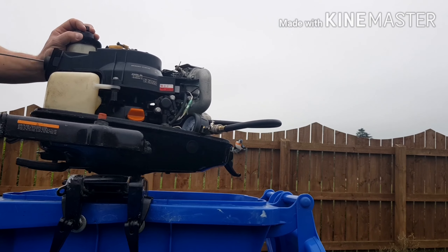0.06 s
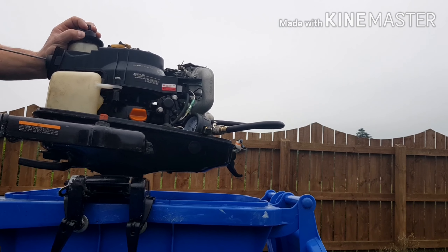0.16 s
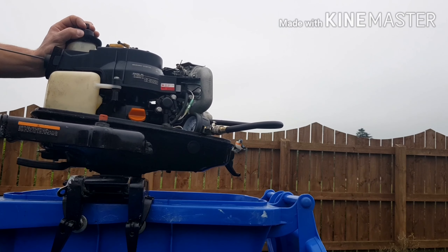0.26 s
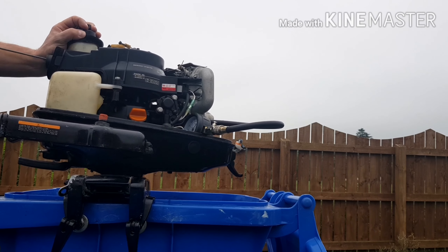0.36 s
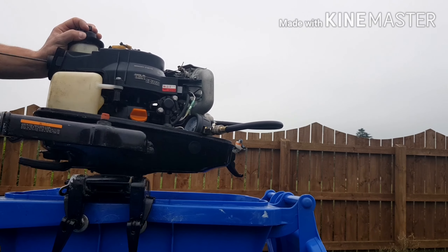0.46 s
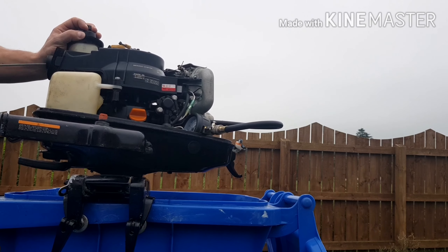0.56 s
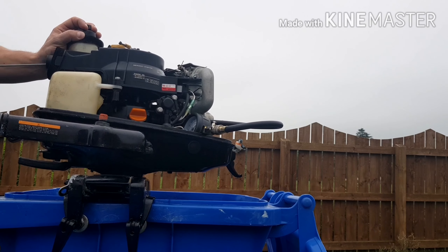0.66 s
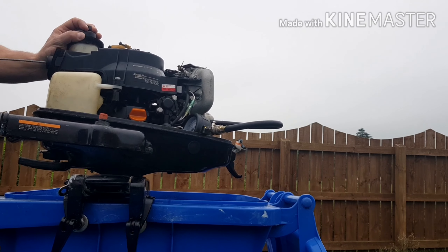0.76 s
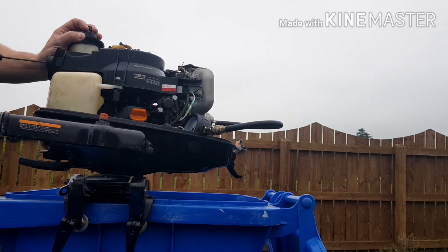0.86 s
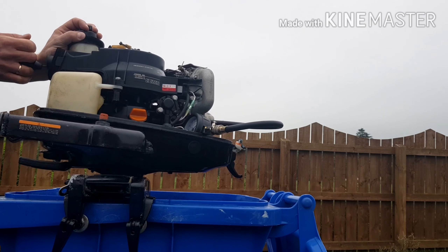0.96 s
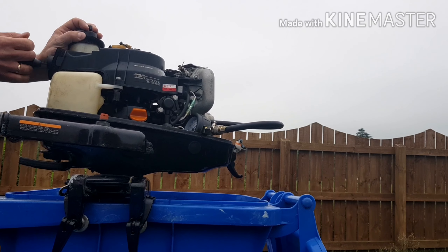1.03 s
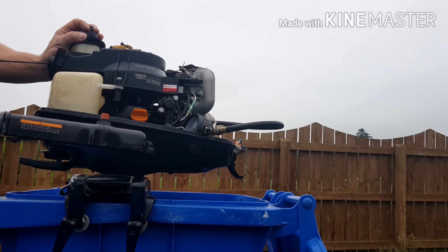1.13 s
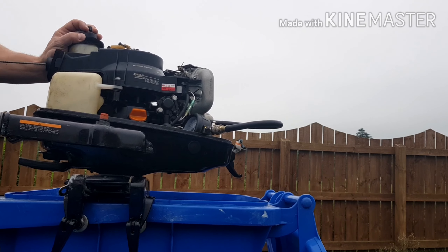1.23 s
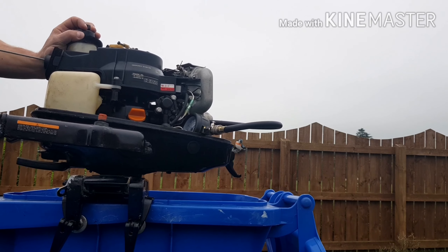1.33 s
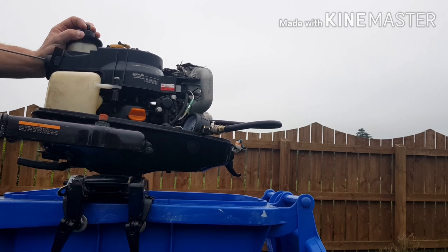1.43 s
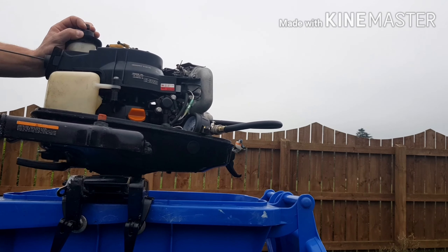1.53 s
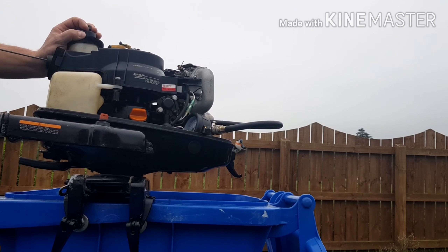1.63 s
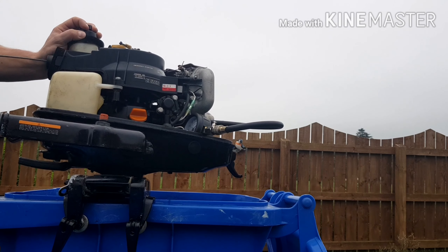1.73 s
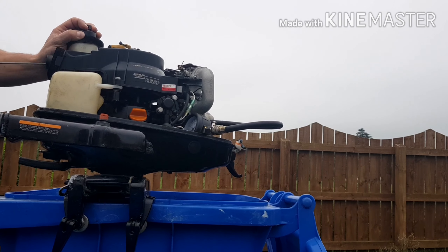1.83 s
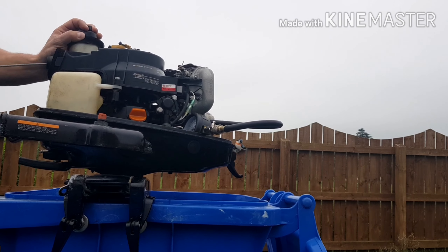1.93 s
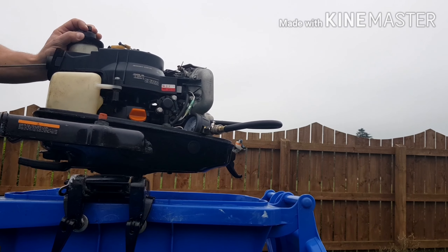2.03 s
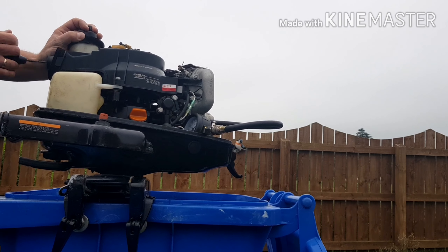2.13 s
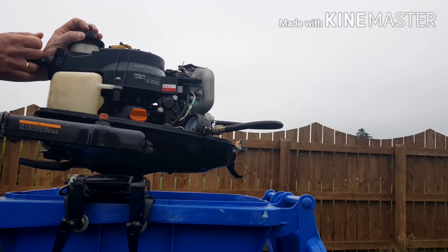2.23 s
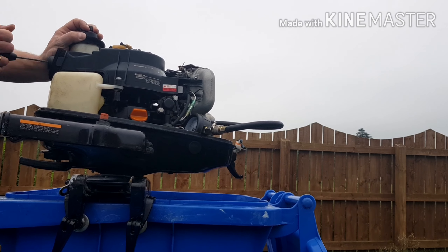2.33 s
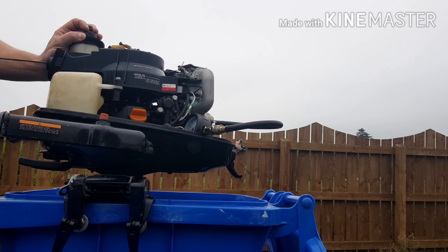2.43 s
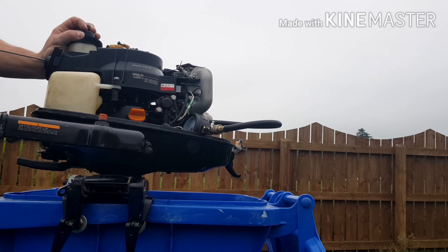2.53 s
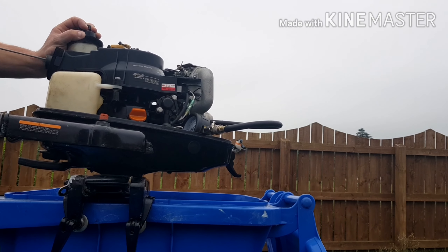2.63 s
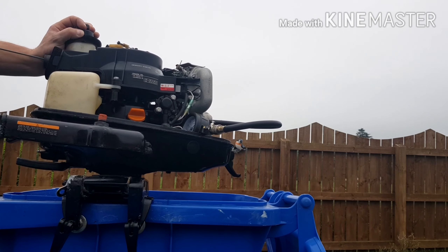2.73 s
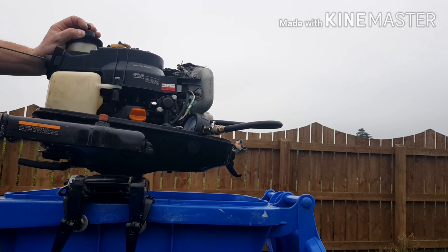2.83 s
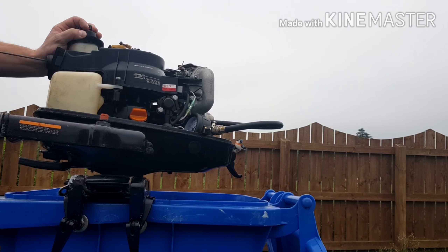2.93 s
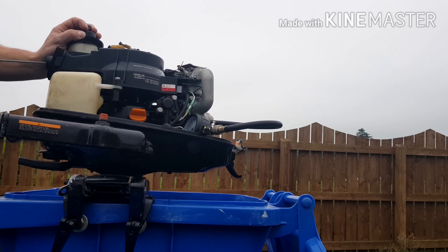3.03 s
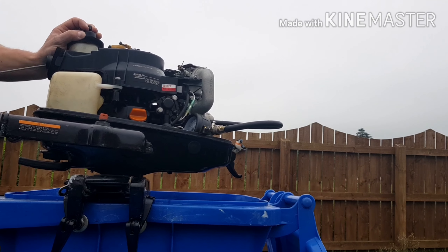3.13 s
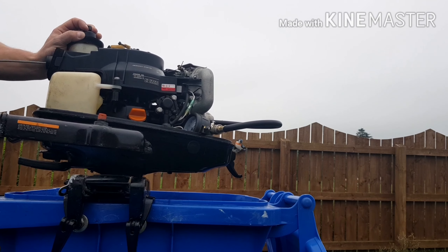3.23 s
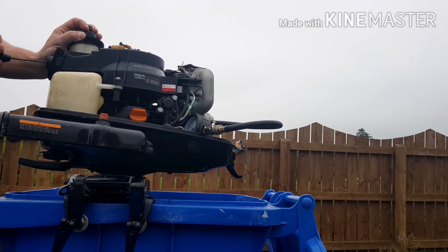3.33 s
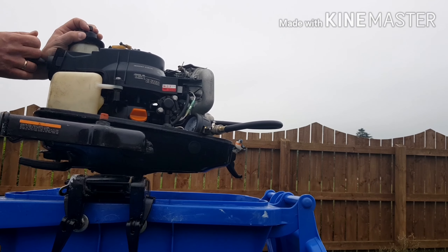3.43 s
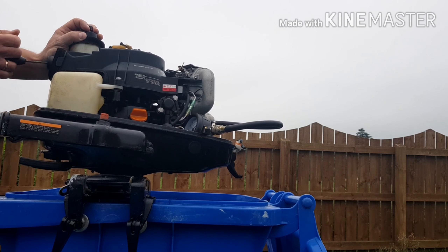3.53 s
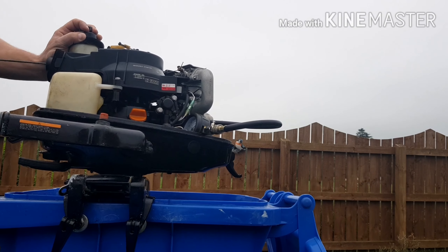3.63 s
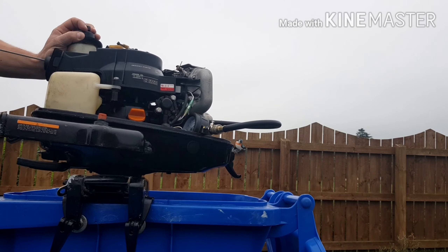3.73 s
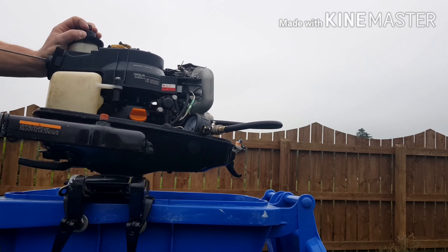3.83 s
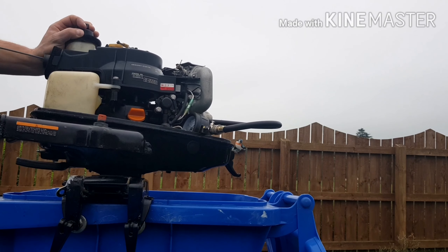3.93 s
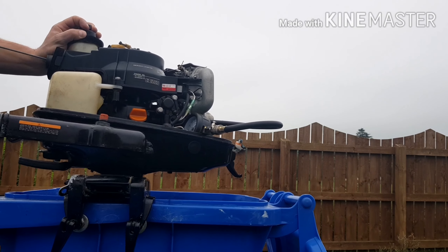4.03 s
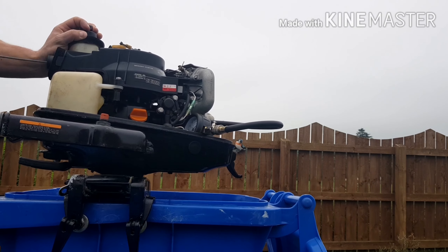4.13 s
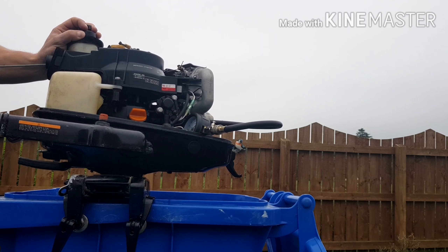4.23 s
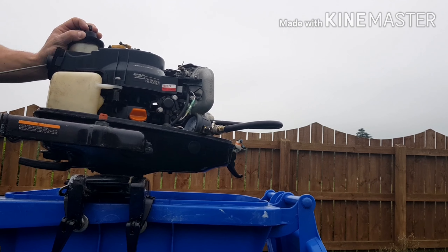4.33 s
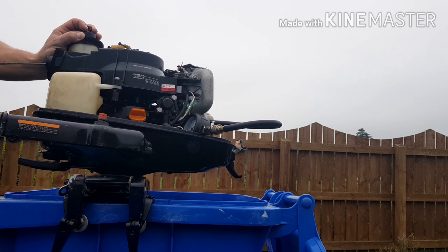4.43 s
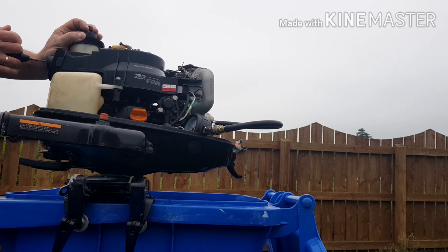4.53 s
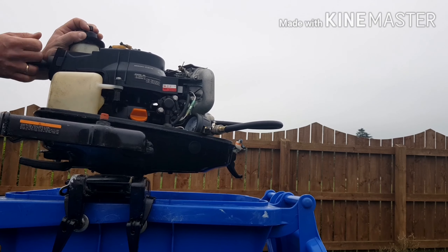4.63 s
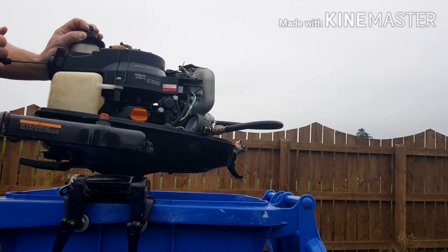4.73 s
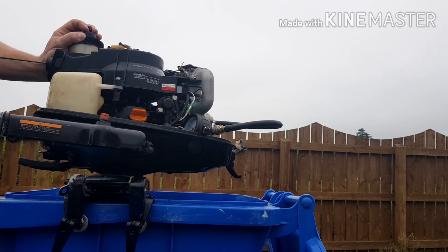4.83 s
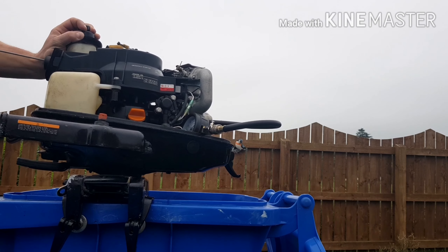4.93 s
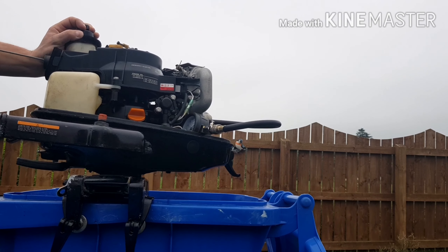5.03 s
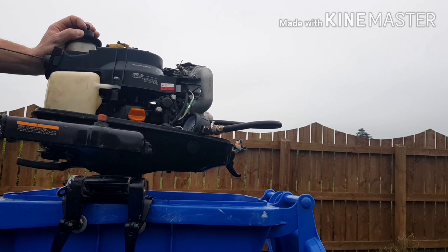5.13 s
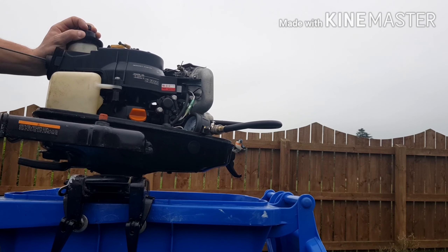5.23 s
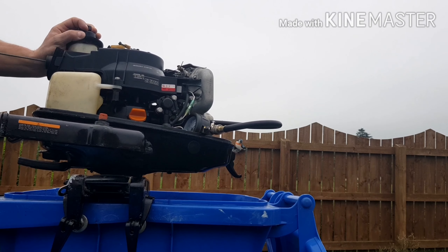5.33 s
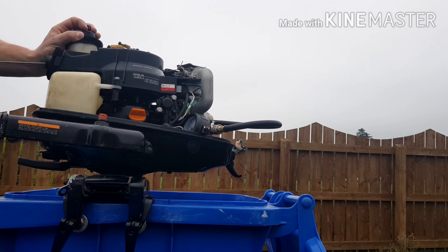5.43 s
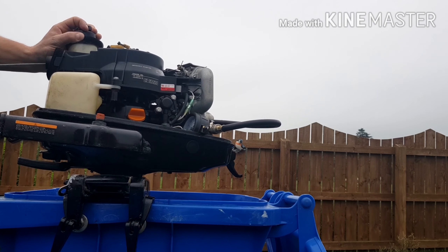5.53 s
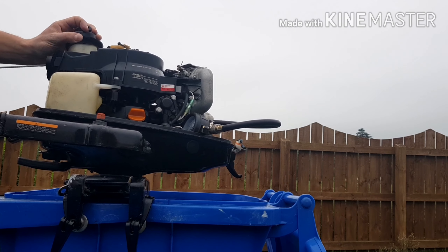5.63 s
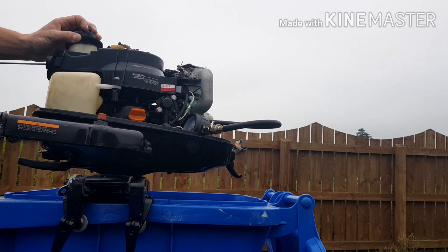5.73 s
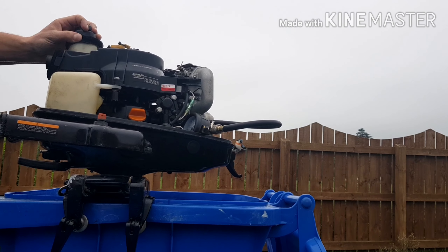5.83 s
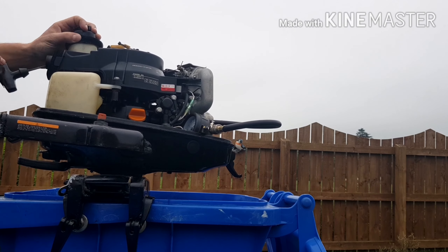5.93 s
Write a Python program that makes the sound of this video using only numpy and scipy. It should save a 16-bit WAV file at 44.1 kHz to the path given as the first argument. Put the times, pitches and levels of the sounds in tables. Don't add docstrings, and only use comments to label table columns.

```python
import sys
import numpy as np
from scipy import signal
from scipy.fft import rfft, irfft, next_fast_len
from scipy.io import wavfile
from scipy.ndimage import uniform_filter1d

SR = 44100
rng = np.random.default_rng(int(sys.argv[2]) if len(sys.argv) > 2 else 0)


def gain_from_db(level_db):
    decades = np.asarray(level_db, float) / 20
    return 10 ** decades


def wav_record(signal):
    frames = np.transpose(np.atleast_2d(signal))
    bounded = np.clip(frames, -1, 1)
    quanta = np.round(bounded * 32767).astype(np.int16)
    wavfile.write(sys.argv[1], SR, quanta)


N = 263714
T = np.arange(N) / SR
FAST = next_fast_len(N)

# (frequency [Hz], level [dB per Hz])
AIR_COLOUR = [(15, -33), (30, -4), (70, 9), (219, -35), (1860, -36), (3120, -29), (3480, -34),
              (14600, -24.5), (16300, -49)]
# (frequency [Hz], left minus right [dB])
PORT_LEAN = [(60, 2.5), (400, 1.6), (2000, 2.2), (8000, 1.8), (13000, 8)]
# (time [s], length [s], level [dB], lowest [Hz], highest [Hz])
RUSTLES = [(5.64, .05, -47.5, 2000, 15000), (5.78, .11, -56, 5100, 15000), (5.72, .4, -54, 1600, 5500),
           (.82, .3, -58, 500, 900), (3.28, .3, -58, 500, 900), (4.5, .3, -57, 500, 900),
           (3.621, .018, -24, 4800, 8500), (2.408, .014, -36, 3000, 8000), (5.862, .016, -55, 700, 8000),
           (5.95, .05, -52, 300, 2500), (3.575, .05, -50, 1500, 6000)]
# (time [s], level [dB], pitch [Hz])
SQUEAKS = [
    [(3.44, -93, 3100), (3.48, -61, 2740), (3.52, -52, 2440), (3.56, -58, 2240)],
    [(5.77, -71, 2000), (5.782, -53, 2100), (5.8, -63, 2200)],
]
# (frequency [Hz], level [dB per Hz])
RUMBLE_COLOUR = [(15, -45.5), (30, -22), (66, -0.5), (157, -2), (210, -5.5), (258, -5.5), (291, -13),
                 (450, -3.5), (580, -13), (990, -120)]
# (frequency [Hz], level [dB per Hz])
SCRAPE_COLOUR = [(1060, -53), (1800, -4.5), (2370, -10), (3220, -10), (3870, -15.5), (5200, -16.5),
                 (14900, -31), (15900, -34), (16300, -71)]
# (frequency [Hz], width [Hz], level [dB])
RATTLE_MODES = [(633, 49, 2.5), (925, 79, 0), (1253, 60, 0.5), (1728, 80, -5.5), (2210, 63, -14.5),
                (2790, 40, -17.5), (3100, 64, -19), (3410, 100, -15)]
# (crank at speed [s], slack before it [dB], rattle [dB], last compression [s], crank still [s])
PULLS = [
    (0.202, -6, -34, 0.79, 0.94),
    (1.408, -10.5, -34, 1.93, 2.41),
    (2.592, -24, -32.5, 3.27, 3.41),
    (3.82, -9.5, -32.5, 4.478, 4.615),
    (4.984, -18.5, -31, 5.56, 5.83),
]
# (rattle at last compression [dB], nearly still [s], level then [dB])
COASTS = [(-44.5, .86, -55), (-43.5, 2.15, -54), (-44.5, 3.34, -54), (-44.5, 4.55, -55), (-45, 5.775, -55)]
# (time [s], peak [dB])
THUMPS = [(0.0312, -23.5), (0.122, -25.5), (0.199, -24), (0.357, -20.5), (0.771, -37), (1.2446, -30),
          (1.288, -24.5), (1.4297, -26), (1.588, -24.5), (1.749, -54), (2.6557, -25), (2.812, -25),
          (3.027, -27.5), (3.6437, -24), (3.84, -24.5), (3.998, -25.5), (4.2085, -27), (5.022, -27),
          (5.072, -35), (5.178, -19), (5.2274, -30), (5.38, -29)]
# (frequency [Hz], level [dB per Hz])
TICK_COLOUR = [(880, -12), (1500, 4.5), (2150, -11), (3440, -15.5), (4070, -7), (7270, -8), (8030, -10.5),
               (9900, -11), (14300, -15.5), (16300, -22)]
# (frequency [Hz], t60 [s], level [dB], group)
BLOCK_MODES = [(3270, .018, -5, 0), (3430, .02, -4, 0), (3570, .022, -3, 0), (3760, .016, -7, 0),
               (2650, .016, -9, 0), (4900, .01, -6, 0)]
# (time [s], peak [dB])
TAPS = [(0.206, -41), (0.362, -39), (0.612, -42), (0.746, -41), (1.847, -44), (3.03, -42), (3.712, -45),
        (4.212, -40), (4.267, -43), (4.7233, -54), (4.878, -55), (5.4346, -44), (0.967, -50),
        (1.126, -44.5), (1.433, -36), (1.592, -45), (1.796, -41), (1.882, -39.5), (2.191, -47),
        (2.3536, -38.5), (2.8154, -38), (3.4172, -45.5), (3.5728, -41), (3.8426, -35), (4.002, -36.5),
        (4.308, -39), (4.7453, -47.5), (5.1818, -40.5), (5.385, -39), (5.4707, -41)]
# (time [s], peak [dB])
FLECKS = [(.0897, -40), (.525, -37), (.552, -46), (2.693, -42), (2.982, -41), (3.04, -45), (3.175, -58),
          (4.1674, -42), (4.176, -44), (4.204, -49), (4.2991, -42), (5.036, -33), (5.251, -42)]
# (time [s], peak [dB])
SNAPS = [(0.1035, -23), (.182, -34), (.243, -35), (0.249, -33), (.2693, -35), (0.7618, -31), (.77, -36),
         (.779, -34.5), (1.209, -33), (1.3225, -24), (1.4771, -30), (1.498, -33), (2.012, -29.5),
         (2.5564, -23.5), (2.7, -33), (2.722, -35), (2.981, -46), (3.2276, -26.5), (3.238, -32.5),
         (3.7418, -24), (3.887, -26.5), (3.907, -32.5), (4.406, -23.5), (4.9274, -27), (5.089, -27.5),
         (5.319, -39), (5.344, -41), (5.635, -28.5)]
# (time [s], peak [dB], touch earlier by [s])
SLAMS = [(0.1619, -22.5, 0.008), (1.3878, -19.5, 0.0097), (2.615, -18, 0.0085), (3.8001, -18, 0.008),
         (4.985, -15, 0.008), (5.069, -17.5, 0.0074)]
# (time [s], peak [dB], spot)
KNOCKS = [(.0954, -21, 0.62), (.205, -28, 1.7), (0.4915, -21, 0.9), (.6103, -28.5, 1.4), (.6884, -31, 0.09),
          (.747, -28.5, 1.2), (1.3142, -24.5, 0.42), (1.6383, -24.5, 1.4), (1.7298, -19, 0.83),
          (2.0152, -32, 0.91), (2.5185, -35.5, 0.12), (2.5467, -26.5, 0.32), (2.5726, -20, 0.47),
          (2.7523, -31, 0.084), (2.9456, -23, 0.14), (3.0273, -29, 2.25), (3.1244, -26, 1.46),
          (3.2306, -30, 0.7), (3.732, -24, 0.49), (4.128, -18, 0.61), (4.2122, -26, 1.6),
          (4.406, -28.5, 1.04), (4.9276, -48, .1), (5.2307, -24, 1.5), (5.3168, -20.5, 0.25),
          (5.434, -32, 2.2), (5.4686, -32.5, 1.7), (5.6355, -33, 1.05)]
# (time [s], peak [dB], spot)
BUMPS = [(0.19, -30, 1.9), (0.301, -18.5, 0.81), (0.364, -23, 1.9), (0.558, -31, 1.3), (1.37, -32, 0.66),
         (1.424, -30, 1.7), (1.435, -19.5, 1.6), (1.472, -17, 1.2), (1.482, -16, 1.36), (1.534, -32, 1.3),
         (1.592, -19, 1.5), (1.794, -25, 1.9), (1.848, -24.5, 1.3), (1.882, -24, 1.94), (2.658, -18, 1.8),
         (2.704, -20, 2.3), (2.818, -17, 1.4), (2.868, -18, 1.1), (3.084, -20.5, 1.1), (3.759, -22, 0.84),
         (3.828, -37, 1.3), (3.845, -19, 1.7), (3.89, -16.5, 1.7), (3.939, -20, 1.1), (4.003, -21, 1.8),
         (4.052, -17, 1.63), (4.093, -32, 0.99), (4.27, -20.5, 0.94), (4.306, -19, 1.34),
         (4.783, -38, 0.47), (4.95, -25, 0.65), (5.006, -22, 0.91), (5.029, -18.5, 1.7), (5.044, -18, 0.83),
         (5.184, -16.5, 1.35), (5.254, -39, 1.5), (5.357, -36.5, 1.2), (5.384, -23, 1.7),
         (5.504, -23, 0.84), (5.599, -41, 0.87)]
# (time [s], peak [dB], spot)
NUDGES = [(.9643, -48.5, 0.59), (1.1267, -44, 0.32), (1.2095, -54, 0.079), (2.2652, -49.5, 0.088),
          (2.354, -42, 0.25), (3.4161, -47, 0.32), (3.5075, -56, 0.11), (3.573, -38.5, 0.65),
          (4.6665, -50, 0.075), (4.694, -55, 0.033)]
# (frequency [Hz], t60 [s], level [dB], group on the spot scale)
COWLING_MODES = [(625.7, 0.17, 2.5, -0.5), (687, 0.032, 1, 1), (912, 0.073, 0.5, 0.5),
                 (1045, 0.13, -2.5, 0.33), (1306, 0.049, 2, 2), (1637, 0.025, 5.5, 2),
                 (1840, 0.04, 3.5, 2.4), (2200, 0.22, -13, 1.7)]
# (frequency [Hz], t60 [s], level [dB], group)
BIN_MODES = [(272, 0.094, -0.5, 0), (417, 0.067, -4, 0), (312, 0.089, -23.5, 0)]
# (time [s], peak [dB])
BITES = [
    (0.0255, -11),
    (1.2291, -16),
    (2.421, -18),
    (3.6342, -13),
    (4.8024, -16.5),
]
# (frequency [Hz], t60 [s], level [dB], group)
BITE_MODES = [(268, .17, -4, 0), (410, .22, -10, 0), (120, .25, -13, 0), (585, .08, -5, 0),
              (650, .1, -1.5, 0), (922, .1, -2.5, 0), (1063, .11, -1, 0), (1160, .05, -10, 0),
              (865, .06, -5, 0), (1650, .04, -6, 0), (2212, .12, -16, 0)]
# (time [s], rim ring [dB], wall ring [dB], upper rings [dB], cowling blow [dB])
GRAZES = [(.0014, -25, -24, -36.5, -25), (.383, -32, -27.5, -44, -29), (1.1648, -40, -34, -49, -46),
          (1.1866, -23.5, -31, -40, -30), (1.6149, -34.5, -36, -40.5, -26), (2.3997, -47, -48, -52, -37),
          (2.4116, -41, -35, -45, -32), (2.8383, -33, -32, -48, -23.5), (3.6193, -42, -42, -50, -33),
          (4.026, -31, -28, -39.5, -26.5), (4.7904, -36, -38, -46, -37), (5.2098, -33, -43, -45.5, -25)]
# (time [s], rim ring [dB], wall ring [dB], upper rings [dB], long ring [dB])
STRIKES = [
    (0.4192, -19, -32, -30, -48.5),
    (1.6492, -27.5, -37, -34.5, -49),
    (2.8745, -33, -33, -28, -41),
    (4.061, -27.5, -43, -29, -46),
]
LOW_RING_DB = (-47, -55, -52, -49)
# (frequency [Hz], t60 [s], level [dB], group)
FREE_RING = [(3128, 1.0, 1, 0), (3120, .45, -5, 0), (3090, .18, -4, 0), (2198, .4, -6, 1),
             (2168, .3, -10, 1)]
CUP_HZ = [6690, 6810, 6255, 6205, 8605, 8340, 8225, 10558, 10425, 10680, 13422, 13630, 13515, 15122]
CUP_GROUP = [0, 0, 1, 1, 2, 2, 2, 3, 3, 3, 3, 3, 3, 3]
# (t60 [s], level [dB])
CUP_RINGS = [(0.11, -3), (0.069, -3.5), (0.12, 1), (0.09, 1), (0.13, 2.5), (0.17, -0.5), (0.1, 2),
             (0.17, 2.5), (0.16, -2.5), (0.15, -2), (0.1, -9), (.09, -6.5), (.08, -7.5), (.06, -3)]

BUMP_DB = -8.5
KNOCK_BIN_DB, NUDGE_BIN_DB = -23, -15


def evened(x):
    return x / np.sqrt(np.mean(x ** 2) + 1e-20)


def read(points, hz):
    f, value = np.transpose(points)
    return np.interp(np.log(hz + 1), np.log(f + 1), value)


def add(mix, s, sound):
    part = mix[round(s * SR):][:len(sound)]
    part += sound[:len(part)]


def coloured(x, points):
    gain = gain_from_db(read(points, np.fft.rfftfreq(FAST, 1 / SR)))
    return evened(irfft(rfft(x, FAST) * gain, FAST)[..., :N])


def filtered(x, order, hz, kind):
    return signal.sosfilt(signal.butter(order, hz, kind, fs=SR, output="sos"), x)


def hiss_pair(apart):
    return rng.standard_normal(N) + apart * rng.standard_normal((2, N))


def resonate(x, hz, width):
    r = np.exp(-np.pi * width / SR)
    if np.ndim(hz) == 0:
        return 2 * signal.lfilter([1 - r], [1, -r * np.exp(2j * np.pi * hz / SR)], x + 0j).real
    turn = np.exp(2j * np.pi * np.cumsum(hz) / SR)
    return 2 * (turn * signal.lfilter([1 - r], [1, -r], x / turn)).real


def lumpy(x, per_s, depth_db):
    span = int(SR / per_s)
    wander = uniform_filter1d(uniform_filter1d(rng.standard_normal(N), span), span)
    return evened(x * gain_from_db(depth_db * evened(wander)))


def struck(modes, group_db, rise_s, detune, length_s, spread_db=6.0):
    hz, t60, db, group = np.array(modes).T[:, :, None]
    t = T[:round(length_s * SR)]
    chance = rng.random((3, len(modes), 1))
    pitch = hz * (1 + detune * (2 * chance[0] - 1))
    swing = np.sin(2 * np.pi * (pitch * t + chance[1]))
    mode_db = np.array(group_db)[group.astype(int)] + db + spread_db * (2 * chance[2] - 1)
    return (swing * gain_from_db(mode_db - 60 * t / t60)).sum(0) * (1 - np.exp(-t / rise_s))


def ports(x, lead_s, wet_db, t60):
    hz, t = np.fft.rfftfreq(FAST, 1 / SR), T[:SR // 6]
    lean = gain_from_db(read(PORT_LEAN, hz) / 2)
    late = np.exp(-2j * np.pi * hz * lead_s)
    pair = irfft(rfft(x, FAST) * np.array([lean, late / lean]), FAST)[:, :N]
    echoes = rng.choice([-1., 1.], (2, len(t))) * (rng.random((2, len(t))) < 2500 / SR)
    echoes = echoes * gain_from_db(-60 * t / t60) * (t > .0015)
    echoes = filtered(echoes, 1, 700, "high")
    echoes /= np.linalg.norm(echoes, axis=1, keepdims=True)
    return pair + gain_from_db(wet_db) * signal.oaconvolve(pair, echoes, axes=1)[:, :N]


def garden():
    both = coloured(rng.standard_normal(N), AIR_COLOUR)
    apart = np.array([coloured(rng.standard_normal(N), AIR_COLOUR) for _ in "lr"])
    return gain_from_db(-64.5) * (1.1 * both + 1.3 * apart)


def rustles():
    out = np.zeros(N)
    for s, length, db, low_hz, high_hz in RUSTLES:
        swell = np.hanning(round(length * SR))
        hiss = filtered(rng.standard_normal(SR // 2), 2, [low_hz, min(high_hz, SR / 2.2)], "band")
        add(out, s, gain_from_db(db) * swell * hiss[:len(swell)])
    return out


def squeaks():
    out = np.zeros(N)
    for rows in SQUEAKS:
        s, db, hz = np.transpose(rows)
        t = np.arange(s[0], s[-1], 1 / SR)
        whistle = evened(resonate(rng.standard_normal(len(t)), np.interp(t, s, hz), 70))
        add(out, s[0], gain_from_db(np.interp(t, s, db)) * whistle)
    return out


def effort():
    points = []
    for (bite, _), (fast, slack_db, db, last, still), (last_db, *slowed) in zip(BITES, PULLS, COASTS):
        points += [(bite - 0.039, -57.5), (bite + 0.0034, -34)]
        points += [(fast - 0.1, db + slack_db), (fast, db)]
        points += [(last, last_db), slowed, (still, -66)]
    return np.interp(T, *np.transpose(points))


def crank_impacts():
    hits = rng.standard_normal(N) * (rng.random(N) < 1800 / SR)
    return lumpy(hits * gain_from_db(1.9 * np.minimum(rng.exponential(1, N), 4)), 73, 1.13)


def rumble():
    noise = coloured(rng.standard_normal(N), RUMBLE_COLOUR)
    return gain_from_db(0.85 * effort() - 11.5) * lumpy(noise, 29, 2.66)


def scrape(impacts):
    freed = sum(np.exp(-((T - s) / 0.047) ** 2) for s, *_ in STRIKES)
    drag = gain_from_db(0.87 * effort() - 25) + gain_from_db(-57) * freed
    noise = coloured(hiss_pair(1.0) + 0.25 * impacts, SCRAPE_COLOUR)
    return gain_from_db(9.5) * drag * lumpy(noise, 46, 2.8)


def rattle(impacts):
    body = np.zeros(N)
    for hz, width, db in RATTLE_MODES:
        felt = lumpy(impacts * rng.choice([-1, 1], N), 44, 3.27)
        body += gain_from_db(db) * resonate(felt, hz, 1.32 * width)
    return gain_from_db(effort() + 0.5) * evened(body)


def chatter():
    clicks = (rng.random(N) < 170 / SR) * gain_from_db(3.5 * np.minimum(rng.exponential(1, N), 4))
    puffs = signal.oaconvolve(clicks, gain_from_db(-60 * T[:600] / .008))[:N] * hiss_pair(.7)
    colour = [(700, -30), (1500, -3), (3500, -4), (5000, -13), (9000, -20), (15000, -26)]  # (Hz, dB per Hz)
    return gain_from_db(effort() - 15) * coloured(puffs, colour)


def thumps():
    out, t = np.zeros(N), T[:SR // 8]
    push = np.sin(2 * np.pi * 165 * t * (1 - 0.52 * t)) + 0.5 * np.sin(2 * np.pi * 80 * t)
    for s, db in THUMPS:
        add(out, s - .003, gain_from_db(db + 4) * push * t / 0.0066 * np.exp(-t / 0.0046))
    return out


def contacts():
    rows = [(s, db, -5.5, 10 + 0.36 * db) for s, db in SNAPS]
    rows += [(s, db - 5, 5, -40) for s, db in FLECKS]
    rows += [(s, db - 13.5, -32, -6) for s, db, _ in KNOCKS]
    rows += [(s, db + BUMP_DB - 11, -25, 0) for s, db, _ in BUMPS]
    rows += [(s, db, -5.5, -1) for s, db, _ in SLAMS]
    rows += [(s - lead, db - 10, -5.5, -1) for s, db, lead in SLAMS]
    rows += [(s, db, -16, 2.5) for s, db in TAPS]
    rows += [(s, -22, 1, -45) for s, *_ in STRIKES]
    rows += [(s, db - 5, -18, -18) for s, db in BITES]
    rows += [(s, db, -27, -9) for s, *_, db in GRAZES]
    return rows


def ticks():
    dull, bright, block, t = np.zeros(N), np.zeros(N), np.zeros(N), T[:1500]
    shape = (1 - np.exp(-t / .0006)) * (gain_from_db(-2 - 60 * t / .013) + gain_from_db(-20 - 60 * t / .04))
    for s, db, bright_db, block_db in contacts():
        add(dull, s - .0004, gain_from_db(db + 3.5) * shape)
        add(bright, s - .0004, gain_from_db(db + bright_db + 3.0) * shape)
        add(block, s, gain_from_db(db + 3.5) * struck(BLOCK_MODES, [block_db - 5.0], 0.0008, 0.035, .03))
    noise = coloured(hiss_pair(1.0), TICK_COLOUR)
    low, high = filtered(noise, 4, 8000, "low"), filtered(noise, 4, 8000, "high")
    return dull * evened(low) + bright * evened(high) + block


def blows():
    rows = [(*row, KNOCK_BIN_DB) for row in KNOCKS]
    rows += [(s, db + BUMP_DB, spot, KNOCK_BIN_DB) for s, db, spot in BUMPS]
    rows += [(*row, NUDGE_BIN_DB) for row in NUDGES]
    rows += [(s - .002, db, 0.49, KNOCK_BIN_DB) for s, *_, db in GRAZES]
    rows += [(s, -32.5, .3, NUDGE_BIN_DB) for s, *_ in STRIKES]
    return rows


def knocks():
    out, t = np.zeros(N), T[:round(.12 * SR)]
    choke = 0.75 * np.exp(-(t / 0.01) ** 3) + 0.19
    for s, db, spot, bin_db in blows():
        group_db = -8.5 * abs(np.array([0, 1, 2]) - spot)
        panel = struck(COWLING_MODES, group_db, 0.0016, 0.021, .12, spread_db=2.0)
        add(out, max(s - .001, 0), gain_from_db(db + 3.5) * choke * panel)
        boom = struck(BIN_MODES, [bin_db], 0.003, 0.011, .12)
        add(out, max(s, 0), gain_from_db(db + 6.5) * boom)
    return out


def bites():
    out, t = np.zeros(N), T[:round(.12 * SR)]
    choke = 0.7 * np.exp(-(t / .018) ** 4) + 0.3
    for s, db in BITES:
        jerk = struck(BITE_MODES, [0], .0012, .008, .12, spread_db=1.5)
        add(out, s - .001, gain_from_db(db - 1.5) * choke * jerk)
    return out


def grazed_cup(modes):
    short, long = np.zeros(N), np.zeros(N)
    for s, rim_db, wall_db, high_db, _ in GRAZES:
        chink = struck(modes, [rim_db, wall_db, high_db + 6, high_db], 0.0018, 0.0015, .2, spread_db=-0.5)
        add(short, s, chink * gain_from_db(-450 * T[:len(chink)]))
        wake = struck(FREE_RING, [wall_db - 23.5, rim_db - 7], 0.0018, .001, .1, spread_db=9.0)
        add(long, s, wake * gain_from_db(-250 * T[:len(wake)]))
    return short, long


def released_cup(modes):
    short, long, t = np.zeros(N), np.zeros(N), T[:4000]
    for (s, rim_db, wall_db, high_db, free_db), low_db in zip(STRIKES, LOW_RING_DB):
        group_db = [rim_db, wall_db, high_db - 1.5, high_db]
        add(short, s, struck(modes, group_db, 0.002, 0.0015, 0.27, spread_db=1.5))
        ring = struck(FREE_RING, [free_db + 6.5, low_db + 10], 0.004, 0.0006, 0.68, spread_db=1.5)
        jolt = np.clip((T[:len(ring)] - .37) / .04, 0, 1)
        add(long, s, ring * gain_from_db(-5 * jolt))
        splash = np.diff(rng.standard_normal(4001)) * (1 - np.exp(-t / 0.0018))
        add(short, s, gain_from_db(high_db - 3 - 60 * t / 0.032) * splash)
        fuzz = sum(resonate(splash, hz, 280) for hz in CUP_HZ[2::2])
        add(short, s, gain_from_db(high_db + 8 - 60 * t / 0.12) * fuzz)
    return short, long


def cup():
    modes = [(hz, *ring, group) for hz, ring, group in zip(CUP_HZ, CUP_RINGS, CUP_GROUP)]
    chinks, wakes = grazed_cup(modes)
    rings, long_rings = released_cup(modes)
    jangle = np.array([lumpy(np.ones(N), 350, 2.8) for _ in "lr"])
    return (chinks + rings) * jangle + (wakes + long_rings) * lumpy(np.ones(N), 60, 2.5)


def scene():
    impacts = crank_impacts()
    body = squeaks() + rumble() + rattle(impacts) + thumps() + knocks() + bites()
    starter = rustles() + scrape(impacts) + chatter() + ticks()
    low = ports(body, 0.00016, -7.5, 0.046)
    top = ports(starter, .0003, -5, .025)
    ring = ports(cup(), .0003, -3, .015)
    return garden() + low + top + ring


def low_pass(x):
    return signal.sosfilt(signal.butter(12, 16470, fs=SR, output="sos"), x)


def record(dry):
    edge = signal.firwin(255, 15750, window=("kaiser", 8), fs=SR)
    mix = signal.oaconvolve(dry, edge[None], "same")
    return low_pass(mix)


dry = scene()
out = record(dry)
wav_record(out)
```